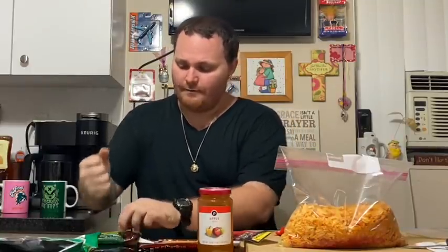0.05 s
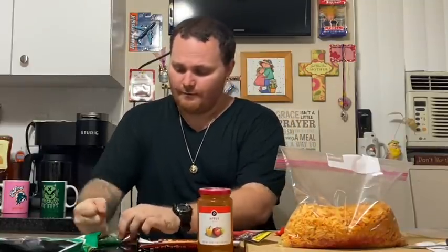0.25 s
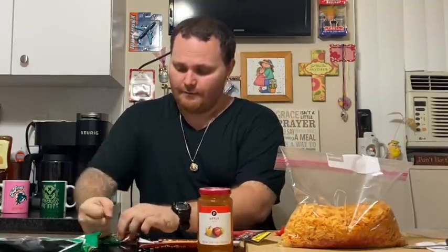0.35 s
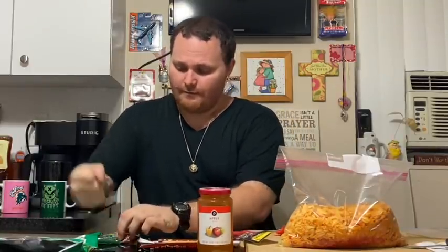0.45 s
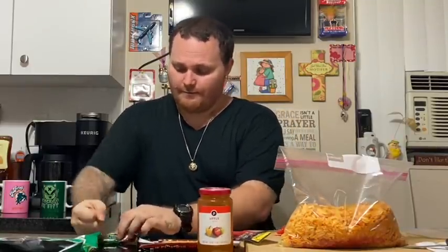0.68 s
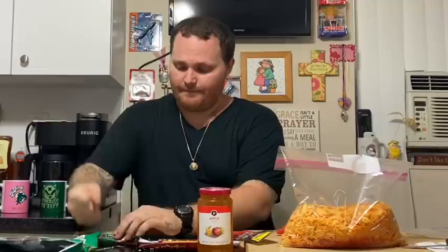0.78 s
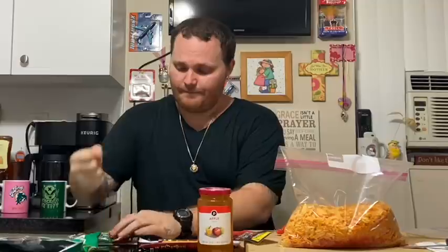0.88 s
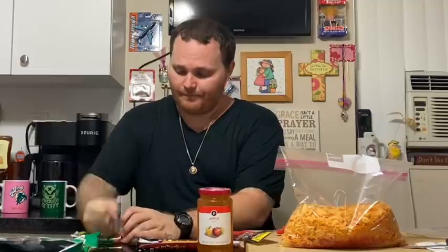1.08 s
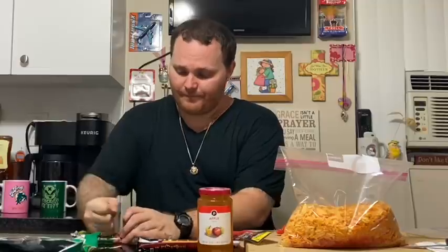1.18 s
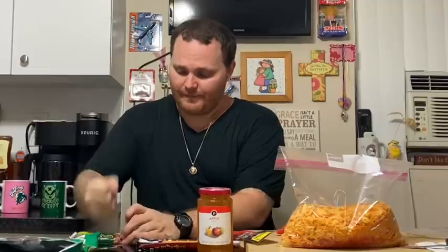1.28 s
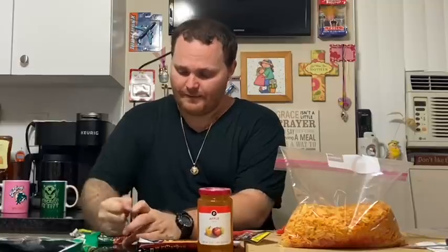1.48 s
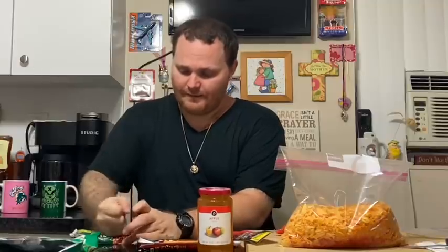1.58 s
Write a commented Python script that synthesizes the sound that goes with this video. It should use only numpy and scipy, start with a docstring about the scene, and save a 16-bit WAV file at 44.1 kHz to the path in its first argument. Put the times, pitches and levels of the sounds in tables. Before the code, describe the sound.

Four fist thumps crush a wrapped bar against a wooden table, the wrapper crinkling between them.

```python
"""A small, hard kitchen, with a pair of microphone ports close to the table.
A fist pounds four times on a wrapped cereal bar. Each blow crunches wrapper and bar and knocks the bar
against the wood, then thuds into the table top, which rings low, shudders and rebounds.
Between blows the wrapper rustles and snaps. Behind it all are short echoes and a low room tone.
The ports hear it with a phase shift between them, and a noise suppressor turns quiet treble down."""
import sys
import numpy as np
from scipy import signal
from scipy.fft import rfft, irfft, next_fast_len
from scipy.io import wavfile
from scipy.ndimage import uniform_filter1d

SR = 44100
rng = np.random.default_rng(int(sys.argv[2]) if len(sys.argv) > 2 else 0)


def master(y):
    """Save y as 16-bit WAV."""
    cut = np.clip(np.atleast_2d(y).T, -1, 1)
    pcm = np.round(cut * 32767)  # scale
    wavfile.write(sys.argv[1], SR, pcm.astype(np.int16))


N = 72765
SIZE = next_fast_len(2 * N)
HZ = np.maximum(np.arange(SIZE // 2 + 1) * SR / SIZE, 1)


def amp(db):
    """dB to gain."""
    return 10 ** (np.asarray(db) / 20)


def rms_one(x):
    """Scale to rms 1."""
    return x / np.sqrt(np.mean(x ** 2) + 1e-20)


def at_hz(points, hz):
    """Read a table on a log-frequency axis."""
    freqs, values = np.transpose(points)
    return np.interp(np.log(hz), np.log(np.maximum(freqs, 1)), values)


def since(s):
    """Seconds after a moment, zero before."""
    return np.maximum(np.arange(N) / SR - s, 0)


def white():
    """White noise."""
    return rng.standard_normal(N)


def grains(per_s, spread_db):
    """Random clicks of uneven size and sign."""
    hits = rng.random(N) < per_s / SR
    sizes = amp(spread_db * np.minimum(rng.exponential(1, N), 4))
    return hits * sizes * rng.choice([-1, 1], N)


def modes(body, t, offsets_db):
    """Decaying sines of a struck body, signs alternating."""
    return sum((-1) ** k * amp(db + offsets_db[k] - 60 * t / t60) * np.sin(2 * np.pi * hz * t)
               for k, (hz, db, t60) in enumerate(body))


# How alike diffuse sound is at the two ports: (frequency [Hz], likeness [0 to 1])
PORT_LIKENESS = [(60, 1), (250, 0.83), (600, 0.21), (2000, 0.17), (4000, 0.83), (7000, 0.54), (9000, 0.76),
                 (14000, .99)]
def spread(make):
    """Left and right spectra: two draws of a random sound, blended to a likeness set by frequency."""
    mid, side = rfft(make(), SIZE), rfft(make(), SIZE)
    alike = np.clip(at_hz(PORT_LIKENESS, HZ), 0, 1)
    return np.sqrt((1 + alike) / 2) * mid + np.sqrt((1 - alike) / 2) * side * [[1], [-1]]


def wide(make, spectrum):
    """A random sound, coloured and spread over both ports; rms 1."""
    return rms_one(irfft(spread(make) * amp(at_hz(spectrum, HZ)), SIZE)[:, :N])


# The kitchen's background: (frequency [Hz], relative level [dB])
ROOM_TONE_SPECTRUM = [(15, -33), (25, 29), (64, 17.5), (1160, -5), (6560, -16.5), (8590, -21), (10400, -66),
                      (14400, -94), (16000, -48)]
def room_tone():
    """Faint steady noise all around the microphone, mostly rumble."""
    return amp(-58) * wide(white, ROOM_TONE_SPECTRUM)


# Decay of the kitchen's echoes: (frequency [Hz], time to fall 60 dB [s])
KITCHEN_DECAY = [(80, 0.46), (300, 0.34), (1000, 0.27), (4000, 0.36), (12000, 0.19)]
def kitchen_echo(x, onset_s=0.0048):
    """Hard walls nearby return diffuse echoes that die away at each octave's own rate."""
    noise, t, tail = spread(white), since(0), 0
    for hz in 40 * 2. ** np.arange(10):
        octave = np.cos(np.pi / 2 * np.clip(np.log2(HZ / hz), -1, 1)) ** 2
        t60 = at_hz(KITCHEN_DECAY, hz)
        tail = tail + irfft(noise * octave, SIZE)[:, :N] * amp(-60 * t / t60) / np.sqrt(t60)
    response = rms_one(tail * (1 - np.exp(-t / onset_s))) / np.sqrt(N)
    return irfft(rfft(response, SIZE) * rfft(x.mean(axis=0), SIZE), SIZE)[:, :N]


# Modes of the bar striking the table: (frequency [Hz], relative level [dB], time to fall 60 dB [s])
BAR_MODES = [(529, -9.5, 0.038), (808.3, -7.5, 0.065), (1019, -7.5, 0.054), (1181, -0.5, 0.041),
             (1393.5, -5.5, 0.038), (1858, 2, 0.014), (2335, -2.5, 0.014)]
def bar_ring(t, tilt_db, luck_db=0):
    """The bar rings briefly on the table; tilt_db per octave makes the contact harder or softer."""
    octaves = np.log2(np.array(BAR_MODES)[:, 0] / 1000)
    return modes(BAR_MODES, t, tilt_db * octaves + luck_db)


# The foil from close by: (frequency [Hz], relative level [dB])
FOIL_SPECTRUM = [(180, -35), (300, -14), (480, -18), (558, -1), (717, -13.5), (970, -6), (5100, -12),
                 (8440, -15.5), (10500, -12.5), (16500, -19.5)]
# Stirring on the table between blows: (time [s], foil level [dB], bar level [dB])
RUSTLE_LEVELS = [(0, -54, -71.5), (0.072, -75.5, -79), (0.083, -47, -61), (0.152, -52, -66),
                 (.17, -47.5, -52), (0.211, -62.5, -70), (.35, -54, -75), (.378, -45.5, -45),
                 (0.419, -56, -67.5), (0.502, -71.5, -91), (0.659, -58, -78), (.70, -50.5, -74),
                 (.76, -46, -65), (0.831, -53, -61.5), (0.942, -66.5, -75.5), (0.989, -55.5, -57),
                 (1.019, -50, -67), (1.07, -53.5, -65), (1.2, -63, -97), (1.256, -38.5, -43.5),
                 (1.301, -58.5, -64.5), (1.36, -69, -64), (1.43, -67.5, -79), (1.59, -67, -84),
                 (1.631, -44.5, -52), (1.65, -51, -47)]
def rustle():
    """The foil creaks in uneven grains while the bar scrapes and taps softly on the table."""
    times, foil_db, bar_db = np.transpose(RUSTLE_LEVELS)
    t = since(0)
    soft_tap = bar_ring(t[:SR // 10], tilt_db=-1.5)
    taps = rms_one(signal.fftconvolve(grains(per_s=700, spread_db=3), soft_tap)[:N])
    foil = wide(lambda: grains(per_s=5000, spread_db=4.5), FOIL_SPECTRUM)
    return amp(np.interp(t, times, foil_db)) * foil + amp(np.interp(t, times, bar_db)) * taps


# Single snaps of the wrapper, close by: (time [s], level [dB], centre frequency [Hz])
WRAPPER_SNAPS = [(.078, -40, 6000), (0.0854, -28, 6800), (0.1648, -31, 1470), (.6954, -34, 3080),
                 (.7455, -25.5, 9700), (.756, -35, 9400), (.766, -37, 10000), (0.8179, -22.5, 13400),
                 (.9853, -40.5, 1410), (1.007, -42, 10000), (1.2479, -24.5, 4600), (1.2575, -38, 7040),
                 (1.265, -31.5, 654), (1.625, -45, 8000), (1.640, -31.5, 1560)]
def snaps():
    """Each snap is a short broad ring of three unrelated pitches; lower ones last longer."""
    out = 0
    for s, db, hz in WRAPPER_SNAPS:
        t = since(s)
        fall_s = 0.00017 + 0.46 / hz
        ring = sum(np.sin(2 * np.pi * hz * ratio * t) for ratio in (.68, .83, 1.1))
        out = out + amp(db) * t / fall_s * np.exp(-t / fall_s) * ring
    return out


# The table springing back after the blows: (time [s], level [dB])
TABLE_REBOUNDS = [(.276, -16.5), (.582, -16), (0.5919, -19.5), (1.1176, -21.5), (1.149, -32), (1.4679, -20),
                  (1.4744, -22)]
def rebounds(hz=212, cycles=1.5):
    """The table rebounds against the fist, one short low pulse each time."""
    out = 0
    for s, db in TABLE_REBOUNDS:
        turns = np.minimum(since(s) * hz, cycles)
        out = out - amp(db) * np.sin(np.pi * turns / cycles) * np.sin(2 * np.pi * turns)
    return out


# The shaking table: (frequency [Hz], relative level [dB])
SHUDDER_SPECTRUM = [(15, -36), (25, -6), (96, 1), (248, -4), (310, -1), (389, -10), (438, -5.5), (708, -14),
                    (786, -14), (900, -19.5), (1170, -27), (1980, -120)]
def shudder(t, fall_s=0.059, tail_s=0.063):
    """The table and the things on it shake after a blow."""
    envelope = amp(-14) * (np.exp(-t / fall_s) + amp(-24) * np.exp(-t / tail_s))
    return envelope * wide(lambda: grains(per_s=900, spread_db=3), SHUDDER_SPECTRUM)


# Modes of the table top: (frequency [Hz], relative level [dB], time to fall 60 dB [s])
TABLE_MODES = [(92.45, -27, 0.67), (155.2, -26.5, 0.55), (203.7, -16, 0.2), (246.6, -25.5, 0.28),
               (277.2, -24.5, 0.24), (314, -23, 0.4), (350.6, -24, 0.39), (419.7, -29.5, 0.31)]
def table_ring(t, spread_db=3.5, rise_per_s=240):
    """The table top rings low and shudders; each blow excites its modes a little differently."""
    ring = modes(TABLE_MODES, t, rng.normal(0, spread_db, len(TABLE_MODES)))
    return (1 - np.exp(-t * rise_per_s)) * (ring + shudder(t))


def knock(t, tilt_db, rise_s=0.0029, spread_db=0.5):
    """The fist drives the bar hard against the table."""
    luck_db = rng.normal(0, spread_db, len(BAR_MODES))
    return (1 - np.exp(-t / rise_s)) * bar_ring(t, tilt_db, luck_db)


# Wrapper and bar breaking, from close by: (frequency [Hz], relative level [dB])
CRUNCH_SPECTRUM = [(240, -38), (400, -5), (1870, -4.5), (6900, -14), (10500, -11), (12100, -15),
                   (13100, -14), (14800, -17), (15700, -26), (16500, -54)]
def crunch(t, attack_s=0.0057, fall_s=0.0049, crumble_s=0.035):
    """Dense fractures swell within milliseconds of contact, fall fast, then crumble on."""
    swell = np.minimum(t / attack_s, 1) ** 2
    after_peak = np.maximum(t - attack_s, 0)
    fall = np.exp(-after_peak / fall_s) + amp(-2.5) * np.exp(-after_peak / crumble_s)
    return swell * fall * wide(lambda: grains(per_s=9000, spread_db=2), CRUNCH_SPECTRUM)


def thud(t, hz, length_s, peak_share, sharpness=1.23):
    """A few low cycles swell in the table top and are damped by the fist."""
    ramp = np.interp(t / length_s, [0, peak_share, 1], [0, 1, 0])
    press = np.sin(np.pi / 2 * ramp) ** sharpness
    return press * np.sin(2 * np.pi * hz * t)


# The fist landing near the microphone: (time [s], crunch level [dB], knock level [dB],
# knock tilt [dB per octave], thud delay [s], thud level [dB], thud frequency [Hz], thud length [s],
# thud peak [share of its length], table ring level [dB])
FIST_BLOWS = [(0.2103, -22.5, -16.5, 7, 0.01523, -10, 173, .018, 0.44, -7),
              (0.551, -25, -23.5, 0, .012, -10.5, 158.5, 0.016, 0.51, -11.5),
              (1.0734, -25.5, -23, 5.5, .0138, -15.5, 164.8, .023, 0.41, -13),
              (1.438, -27, -19, -1.5, 0.01092, -19, 161.4, 0.021, 0.24, -14)]
def blows(knock_delay_s=0.003, low_cut_hz=447):
    """The fist crushes the bar, then reaches the table: returns bass-free contact and low table sound."""
    contact, table = 0, 0
    for s, crunch_db, knock_db, tilt_db, delay_s, thud_db, hz, length_s, peak, ring_db in FIST_BLOWS:
        contact = contact + amp(crunch_db) * crunch(since(s))
        contact = contact + amp(knock_db) * knock(since(s + knock_delay_s), tilt_db)
        t = since(s + delay_s)
        table = table + amp(thud_db) * thud(t, hz, length_s, peak) + amp(ring_db) * table_ring(t)
    low_cut = signal.butter(2, low_cut_hz, "high", fs=SR, output="sos")
    return signal.sosfilt(low_cut, contact), table


def scene():
    """Wrapper, bar and table from close by, with the kitchen's echo and room tone behind them."""
    contact, table = blows()
    bright, ticks, low = contact + rustle(), snaps(), table + rebounds()
    echo = kitchen_echo(amp(-3) * bright + amp(-9.5) * ticks + amp(-12) * low)
    return bright + ticks + low + echo + room_tone()


def suppress_noise(x, threshold_db=-59.5, slope=0.57, window_s=0.016, above_hz=500):
    """Above the bass, sound loses a further `slope` dB for each dB it lies under the threshold."""
    bass = signal.sosfiltfilt(signal.butter(2, above_hz, fs=SR, output="sos"), x)
    upper = x - bass
    power = uniform_filter1d(np.mean(upper ** 2, axis=0), int(window_s * SR))
    level_db = 10 * np.log10(power + 1e-12)
    return bass + upper * amp(slope * np.minimum(level_db - threshold_db, 0))


# Phase between the microphone ports: (frequency [Hz], left lead [rad])
PORT_LEAD = [(0, 0), (1890, .1), (3190, 1.3), (5800, 1.5), (8500, -3.14), (10200, -6.3), (12050, -9.42),
             (13800, -12.5), (15400, -15.7), (17000, -17)]
# Balance between the ports: (frequency [Hz], left minus right [dB])
PORT_LEVELS = [(60, 0.5), (110, -1.5), (200, -0.5), (380, 1.5), (700, -0.5), (1290, 0.5), (2380, 0),
               (4400, 3.5), (8120, 1), (15000, -1)]
def record(dry, low_cut_hz=56.3, stopband_hz=16700):
    """The two ports differ in phase and level; deep bass, quiet treble and the very top are cut."""
    hz, lead = np.transpose(PORT_LEAD)
    left = np.exp(.5j * np.interp(HZ, hz, lead)) * amp(at_hz(PORT_LEVELS, HZ) / 2)
    ports = irfft(rfft(dry, SIZE) * [left, 1 / left], SIZE)[:, :N]
    low_cut = signal.butter(3, low_cut_hz, "high", fs=SR, output="sos")
    high_cut = signal.cheby2(12, 60, stopband_hz, fs=SR, output="sos")
    return signal.sosfilt(high_cut, suppress_noise(signal.sosfilt(low_cut, ports)))


dry = scene()
out = record(dry)
master(out)
```